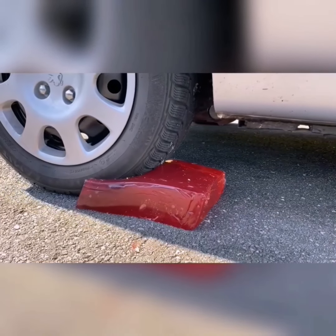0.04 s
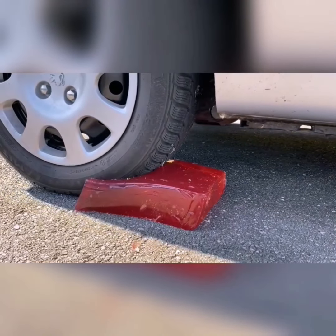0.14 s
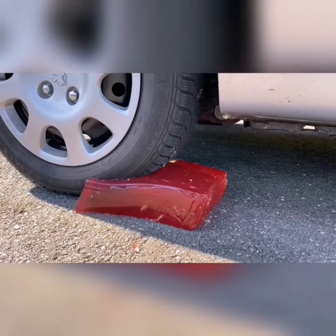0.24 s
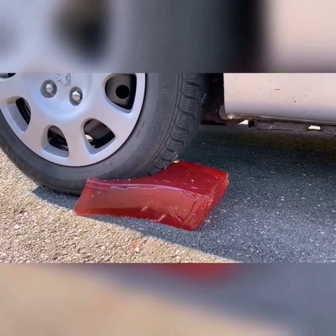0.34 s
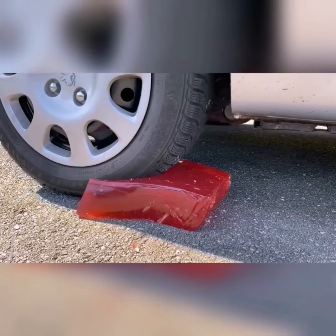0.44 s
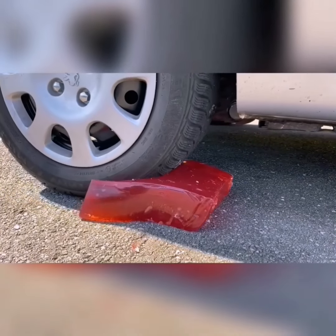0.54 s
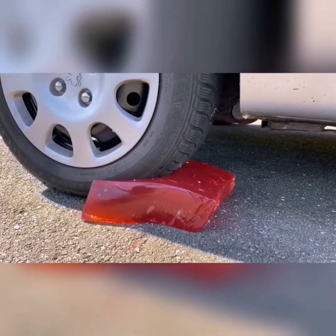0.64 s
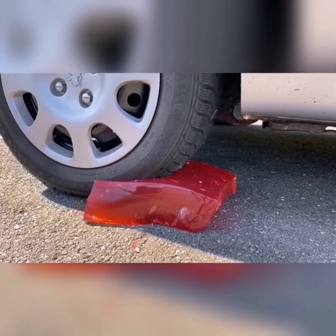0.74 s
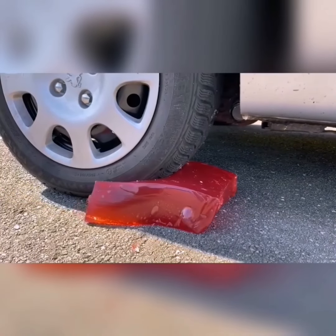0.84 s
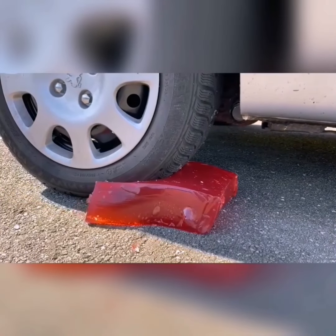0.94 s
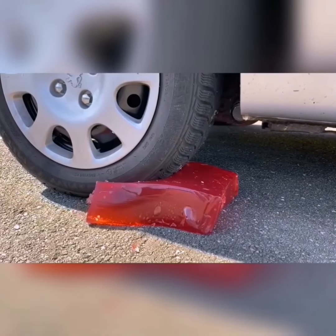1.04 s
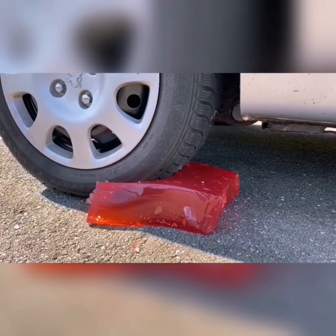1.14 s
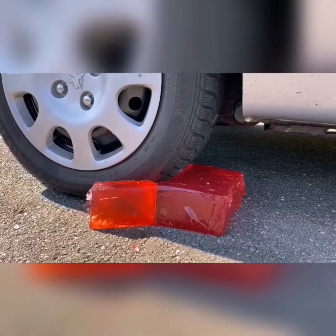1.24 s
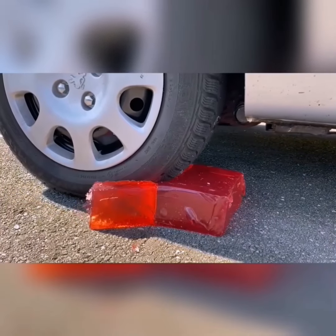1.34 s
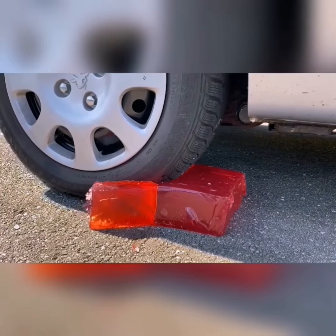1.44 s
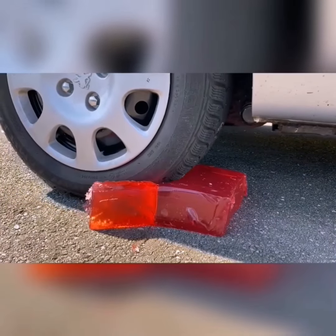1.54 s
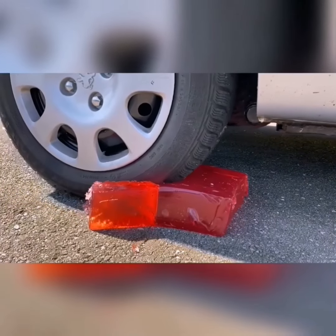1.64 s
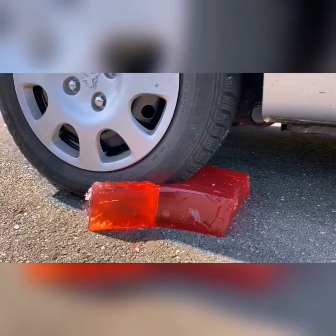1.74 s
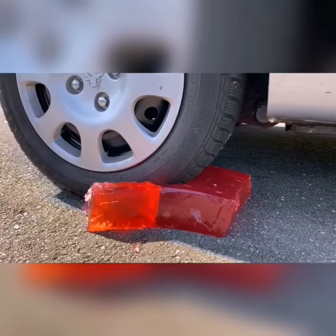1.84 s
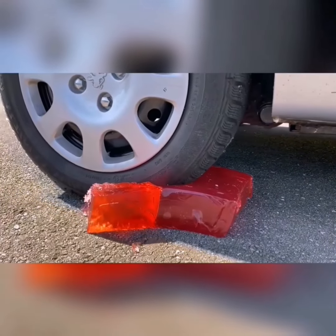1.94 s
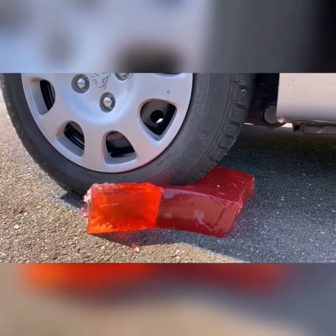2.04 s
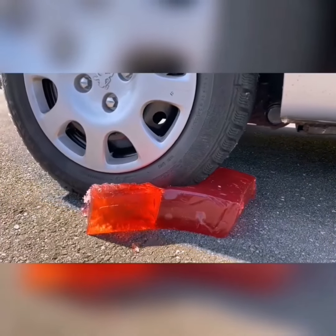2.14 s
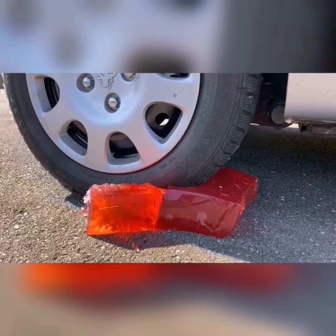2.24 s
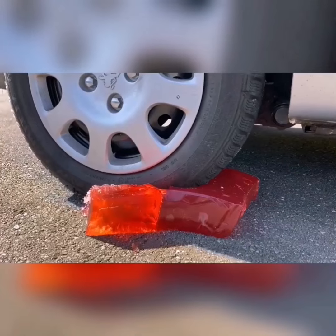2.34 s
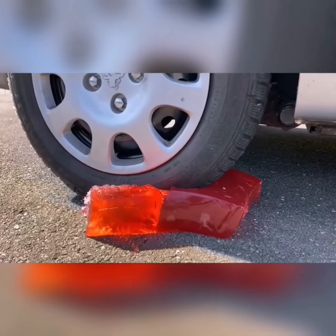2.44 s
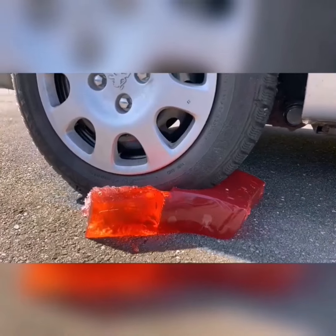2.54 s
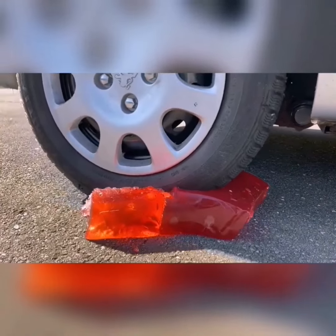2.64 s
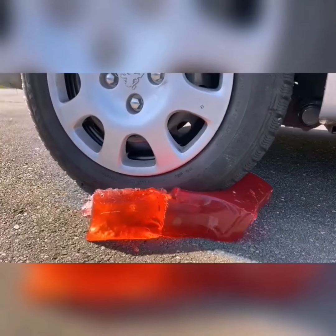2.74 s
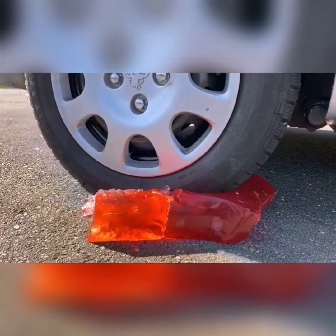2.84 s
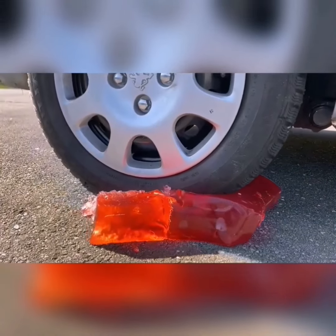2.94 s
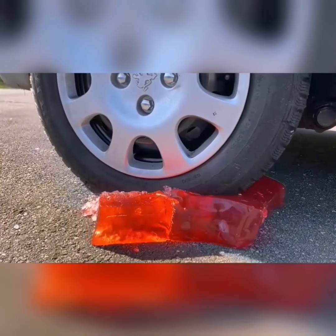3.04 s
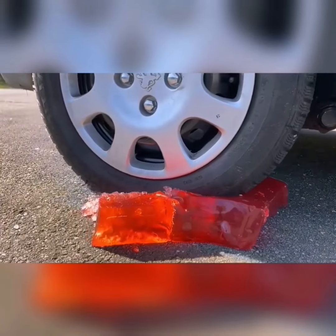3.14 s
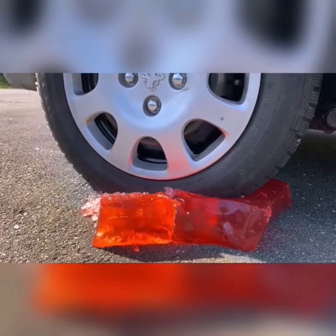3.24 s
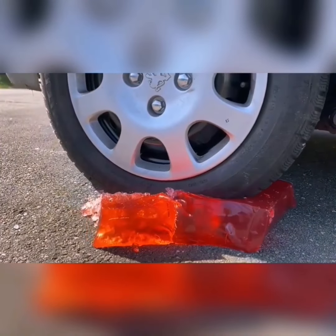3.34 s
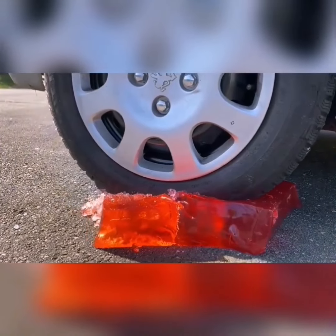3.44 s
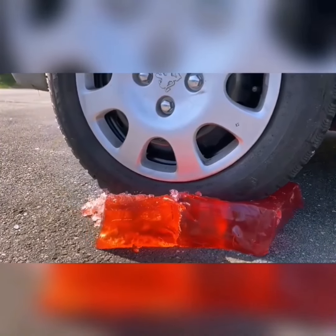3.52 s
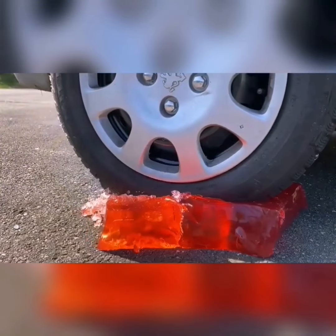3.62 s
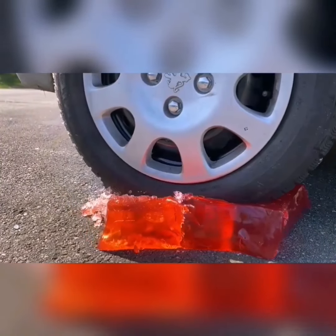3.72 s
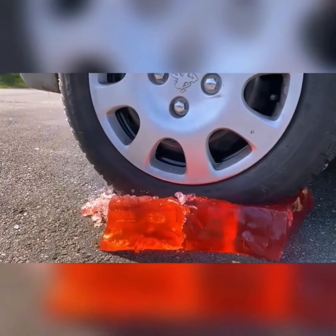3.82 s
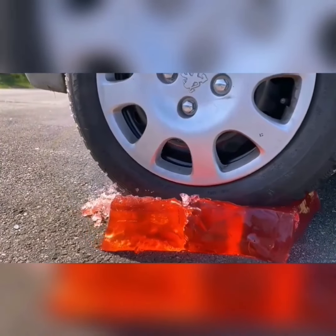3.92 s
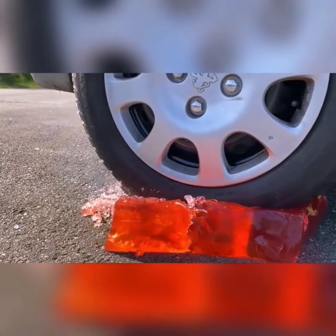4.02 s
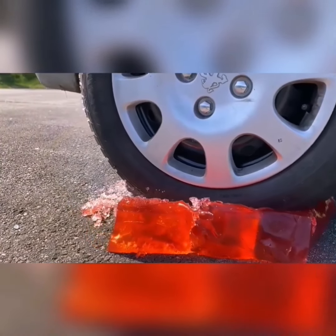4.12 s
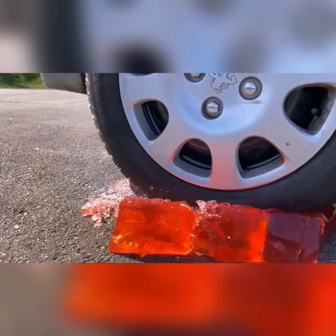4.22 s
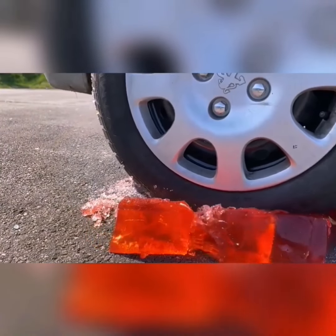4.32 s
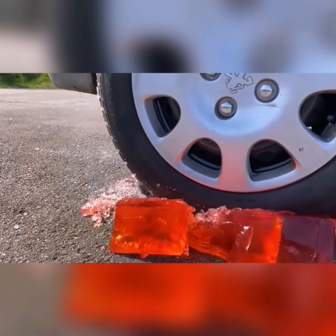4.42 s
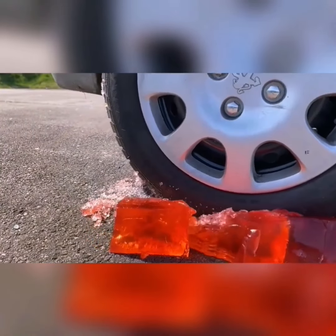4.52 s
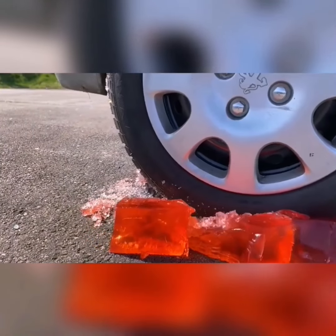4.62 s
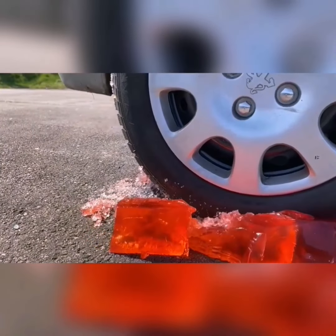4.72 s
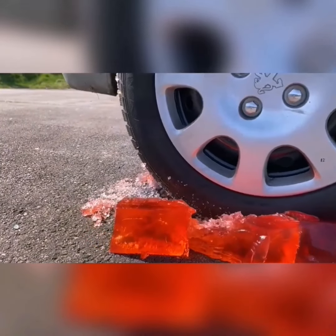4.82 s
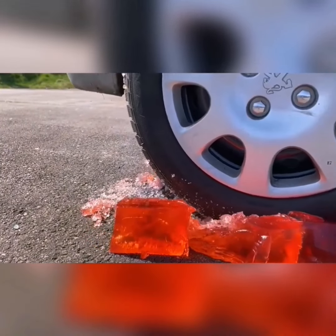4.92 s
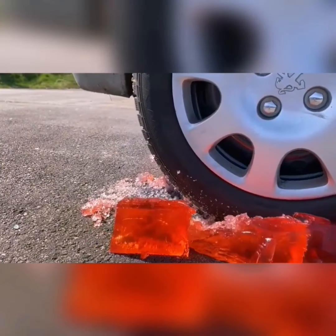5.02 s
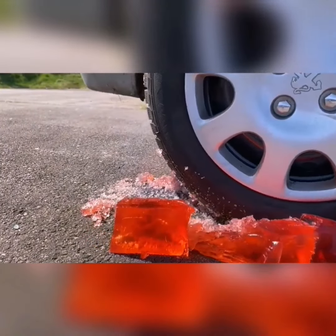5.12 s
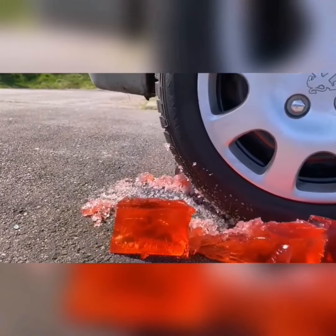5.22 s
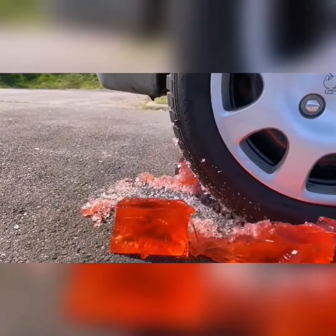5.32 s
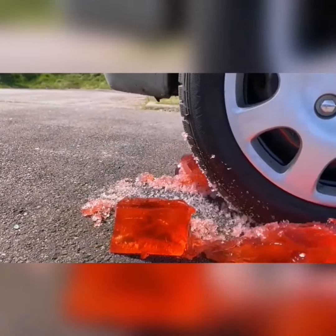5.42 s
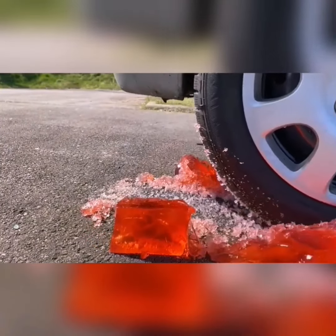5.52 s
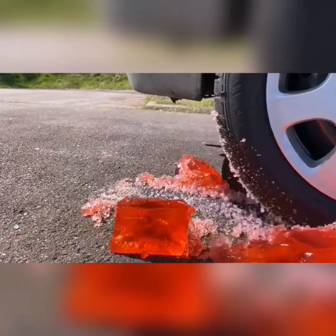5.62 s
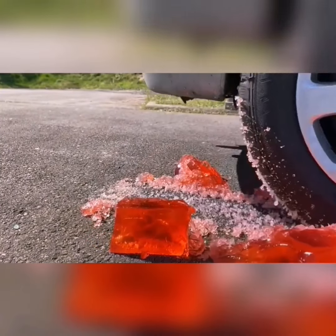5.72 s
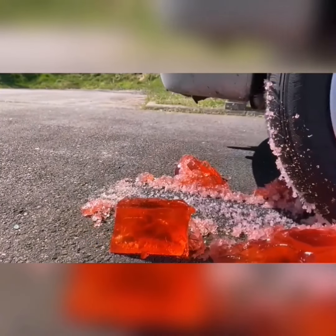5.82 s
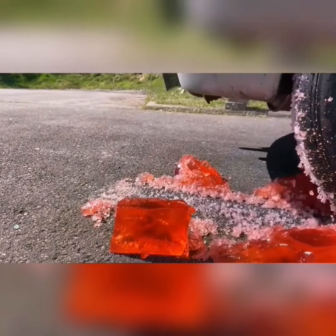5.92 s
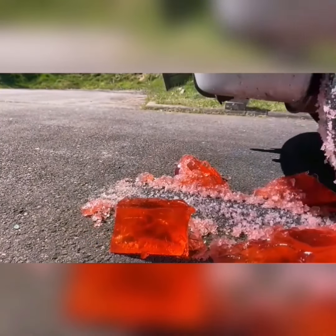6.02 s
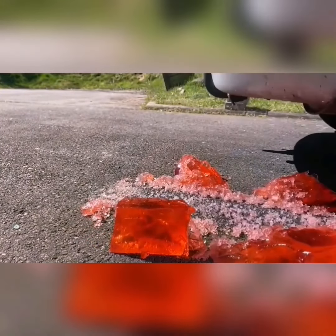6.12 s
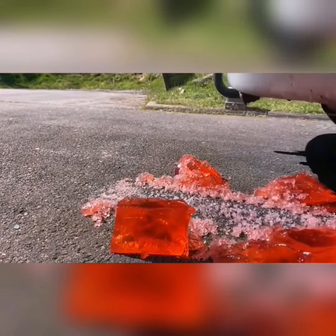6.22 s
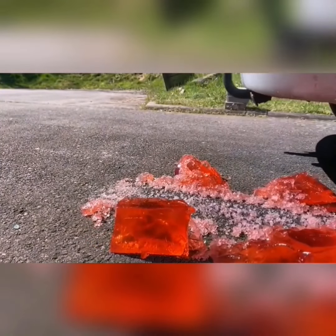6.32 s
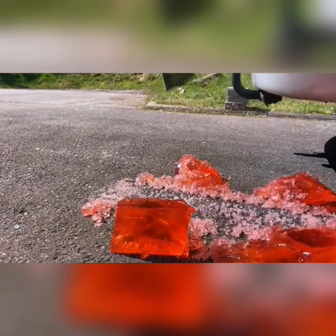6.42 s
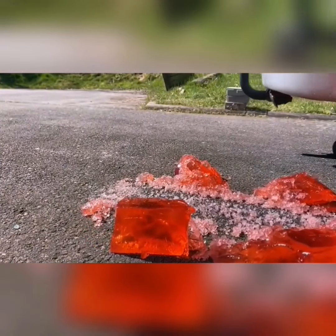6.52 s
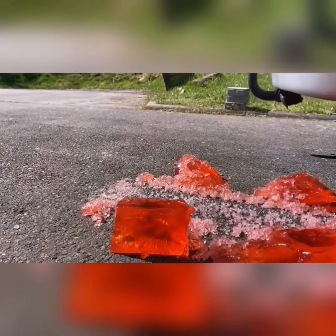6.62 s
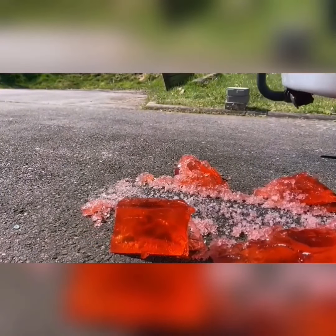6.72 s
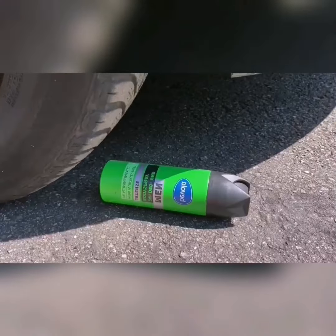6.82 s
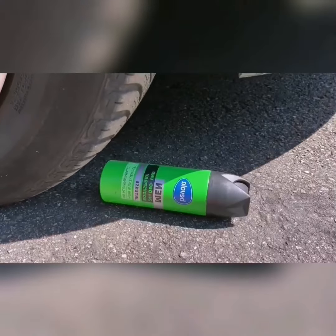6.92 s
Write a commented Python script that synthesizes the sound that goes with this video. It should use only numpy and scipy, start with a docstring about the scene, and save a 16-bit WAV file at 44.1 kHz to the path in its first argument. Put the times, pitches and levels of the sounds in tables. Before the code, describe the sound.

Heard in stereo close to the wheel on a paved surface, a small car idles with a lumpy, low putter and a faint thin whistle. Repeated light revs build a booming throb with clatter and a wavering whine. The tyre crushes a block of jelly, giving scattered wet pops and gritty crackles that grow more frequent as the revs fall away. At the very end, everything cuts to a short hiss without bass.

```python
"""A small car's exhaust putters low and uneven, heard on a stereo microphone beside the tyre.
The car creeps in blips of throttle over a block of jelly: firings boom through the silencer above
the engine's roar and clatter, with a thin whistle, brief squeaks and a geared whine.
Jelly and grit snap and squelch under the tread. At the end a bassless rush takes over abruptly."""
import sys
import numpy as np
from scipy import signal
from scipy.fft import rfft, irfft, next_fast_len
from scipy.io import wavfile
from scipy.ndimage import uniform_filter1d

SR = 44100
rng = np.random.default_rng(int(sys.argv[2]) if len(sys.argv) > 2 else 0)


def pcm_store(signal):
    """Save signal as 16-bit PCM."""
    levels = np.round(np.clip(np.atleast_2d(signal), -1, 1) * 32767)
    wavfile.write(sys.argv[1], SR, levels.astype(np.int16).T)


N = 306915
TIME = np.arange(N) / SR


def gain_of(db):
    return 10 ** (np.asarray(db) / 20)


def unit_rms(x):
    return x / np.sqrt(np.mean(x ** 2) + 1e-20)


def over_time(table):
    """A table's columns, interpolated at every sample."""
    s, *columns = np.transpose(table)
    return np.squeeze([np.interp(TIME, s, c) for c in columns])


def over_frequency(table, hz):
    """A table's columns, interpolated on a log frequency axis."""
    f, *columns = np.transpose(table)
    return np.squeeze([np.interp(np.log(hz + 1), np.log(f + 1), c) for c in columns])


def wander(rate_hz, count=1):
    """Rows of slow random drift, rms 1."""
    size = int(SR / rate_hz)
    white = rng.standard_normal((count, N))
    return unit_rms(uniform_filter1d(uniform_filter1d(white, size, axis=1), size, axis=1))


def noise_pair(colour_db, patchy_db):
    """Two unrelated noises of one colour, with drifting louder and softer patches."""
    frames, hz = N // 256 + 5, np.fft.rfftfreq(1024, 1 / SR)
    a, b, c, d, patches = rng.standard_normal((frames, 513, 5)).T
    patches = unit_rms(uniform_filter1d(uniform_filter1d(patches, size=8, axis=0), size=10, axis=1))
    spectra = np.array([a + 1j * b, c + 1j * d]) * gain_of(colour_db(hz)[:, None] + patchy_db * patches)
    return unit_rms(signal.istft(spectra, nperseg=1024, noverlap=768)[1][:, :N])


def band(x, edges_hz, order):
    return unit_rms(signal.sosfilt(signal.butter(order, edges_hz, "band", fs=SR, output="sos"), x))


def resonance(hz, centre_hz, width_hz):
    return 1 / (1 + (2 * (hz - centre_hz) / width_hz) ** 2)


# Silencer modes, under the car: f/Hz, nominal width/Hz, level/dB
SILENCER_MODES = [(82.6, 19.8, 0.5), (153.8, 40, -2.5), (201, 47.7, -10), (264, 61, -16.5), (63.3, 13.7, 0),
                  (133.4, 32.7, -9.5)]

def silencer(hz):
    """Gain in four ranges: hum, boom, bark and rasp. The modes alternate in sign."""
    hum, boom, bark, rasp, low_hum, low_boom = (
        (-1) ** k * gain_of(db) * resonance(hz, f, width) ** 1.55
        for k, (f, width, db) in enumerate(SILENCER_MODES))
    rasp = abs(rasp) + gain_of(-32.5) * resonance(hz, 350, 160)
    return np.array([hum + low_hum, boom + low_boom, bark, rasp])


# The upper modes shift as the tailpipe nears the microphone: t/s, bark/dB, rasp/dB
TAILPIPE_APPROACH = [(0, 7.5, -5), (1.5, 4.5, 4.5), (3.3, -1, -1.5), (3.9, 2.5, -1), (4.501, -7.5, 7),
                     (5.03, 2, 7.5), (5.25, -2, 9), (5.45, 5.5, 11.5), (5.65, -9, 9.5), (6.76, 1.5, 13.5)]

def exhaust(hz, turns, first_db, level_db, lift_db, rough, spread_db):
    """Firing orders and turbulent gas pass the silencer; each firing has its own strength."""
    bark_db, rasp_db = over_time(TAILPIPE_APPROACH)
    range_db = [lift_db + 1, lift_db + 2.5, 1.59 * lift_db + bark_db - 3.5, 1.18 * lift_db + rasp_db - 5]
    gains = gain_of(level_db + np.array(range_db))
    noisy = np.array([.4 * rough, .7 * rough, rough, rough ** .8])  # the upper ranges blur first
    order = np.arange(3, 25)[:, None] / 2
    passed = silencer(order * hz) * np.where(order % 1, gain_of(-42), 1)  # half orders are faint
    level = (passed * (gains * np.sqrt(1 - noisy))[:, None]).sum(0)
    unsteady = gain_of(wander(rate_hz=20, count=len(order)))
    strength = gain_of(spread_db * np.interp(turns, np.arange(400), rng.standard_normal(400)))
    # the first mode delays what passes through it, which spreads a firing in time
    hum_hz, hum_width, _ = SILENCER_MODES[0]
    lag = 0.62 * np.arctan(2 * (order * hz - hum_hz) / hum_width)
    overtones = level * unsteady * np.sin(2 * np.pi * order * turns + 0.67 * order - lag)
    first_order = gain_of(first_db) * np.sin(2 * np.pi * turns + 0.045)
    gas = unit_rms(irfft(rfft(rng.standard_normal(N)) * silencer(np.fft.rfftfreq(N, 1 / SR)), N))
    puffs = gain_of(3.9 * np.cos(2 * np.pi * turns) + 4.6 * wander(rate_hz=6.8)[0])
    turbulence = gain_of(-4) * (gains * np.sqrt(noisy) * puffs * gas).sum(0)
    return np.sqrt(2) * strength * (overtones.sum(0) + first_order) + turbulence


# Modes of the car's sheet metal: f/Hz, nominal width/Hz, relative level/dB
PANEL_MODES = [(507, 36, -12.5), (545, 30, -17), (630, 28, -14.5), (680, 26, -12.5), (752, 34, -13),
               (792, 36, -14), (1014, 24, -23.5), (1460, 34, -14), (1603, 50, -15), (1957, 80, -16.5),
               (2540, 130, -16.5), (2765, 50, -20.5)]
LOW_PANELS = [mode for mode in PANEL_MODES if mode[0] < 1200]
HIGH_PANELS = [mode for mode in PANEL_MODES if mode[0] > 1200]

def panels(modes):
    """Sheet metal shaken by the engine: narrow modes that swell and fade by chance."""
    out, swells = np.zeros((2, N)), gain_of(4 * wander(rate_hz=12, count=len(modes)))
    for (hz, width, db), swell in zip(modes, swells):
        mode = signal.iirpeak(hz, hz / width, SR)  # passed twice for steep skirts
        ring = signal.lfilter(*mode, signal.lfilter(*mode, rng.standard_normal((2, N))))
        out += gain_of(db - 1.5) * swell * unit_rms(ring)
    return out


def knock(turns, t60_s=0.036, strike_turn=0.2012):
    """Every firing strikes the large panels, which ring briefly."""
    t, firing = np.arange(3000) / SR, np.floor(turns - strike_turn).astype(int) + 1
    strikes = np.diff(firing, prepend=firing[0]) * gain_of(1.5 * rng.standard_normal(400))[firing]
    pair = []
    for _ in range(2):
        ring = sum(gain_of(db - 60 * t / t60_s) * np.sin(2 * np.pi * (hz * t + rng.random()))
                   for hz, _, db in LOW_PANELS)
        pair.append(signal.oaconvolve(strikes, ring * np.minimum(t / 0.0014, 1))[:N])
    return unit_rms(np.array(pair))


# Spectrum of the roar at the tyre: f/Hz, relative density/dB
ROAR_SPECTRUM = [(30, -24), (60, -3), (150, 0), (230, 0), (300, 1), (400, -2), (500, 3), (650, 1),
                 (800, -1), (1000, -4.5), (1250, -9), (1600, -60)]

def roar(throb, pedal):
    """Low engine noise throbs with the firings; throttle shakes the low panels harder."""
    rumble = noise_pair(lambda f: over_frequency(ROAR_SPECTRUM, f), patchy_db=3.5)
    return rumble * gain_of(-3 + 0.5 * throb) + panels(LOW_PANELS) * gain_of(0.22 * throb + pedal)


# Spectrum of the clatter at the tyre: f/Hz, relative density/dB
CLATTER_SPECTRUM = [(700, -30), (1150, -5), (1400, -1), (1700, 0), (2500, -5), (4000, -12), (6300, -15),
                    (8000, -15), (10000, -14.5), (13000, -20), (14500, -21), (14900, -24), (15400, -52),
                    (17000, -65)]

def clatter(throb):
    """Bright engine noise throbs with the firings over the high panel modes."""
    rattle = noise_pair(lambda f: over_frequency(CLATTER_SPECTRUM, f), patchy_db=2.5)
    return rattle * gain_of(0.22 * throb) + panels(HIGH_PANELS)


# Engine speed: t/s, firing rate/Hz
FIRING_RATE = [(0, 32.1), (0.2, 28.2), (0.33, 24.4), (0.48, 22.5), (0.6, 25.7), (0.7, 28), (0.86, 28.8),
               (1.2, 26.3), (1.35, 27.5), (1.43, 21.5), (1.515, 25), (1.555, 27.5), (1.6, 32.5),
               (1.7, 39.8), (1.78, 46), (1.84, 47.5), (1.95, 46.1), (2.15, 45.7), (2.31, 42.9),
               (2.52, 36.5), (2.74, 43), (2.88, 45), (3.09, 40), (3.33, 51.8), (3.46, 56), (3.56, 51.5),
               (3.65, 51), (3.79, 43.5), (4, 55.8), (4.12, 52), (4.25, 55.5), (4.37, 51.5), (4.47, 60),
               (4.59, 72), (4.66, 67), (4.76, 67), (4.93, 58), (5.17, 78), (5.39, 67.5), (5.51, 62.5),
               (5.62, 51), (5.92, 50), (6.05, 44), (6.2, 39), (6.36, 33), (6.5, 28.5), (6.76, 23.5)]
# Off the throttle, from beside the tyre: t/s, first order/dB, exhaust above it/dB, roar/dB, clatter/dB
COAST_LEVELS = [(0, -43, -45, -34.5, -49), (.2, -31.5, -37, -40, -54), (.45, -38, -35.5, -42, -61.5),
                (.9, -34, -32.5, -37.5, -55), (1.18, -31, -37.5, -40, -50.5),
                (1.228, -55, -38.5, -41.5, -69), (1.38, -54, -37.5, -42, -73), (1.5, -39, -32.5, -41, -53),
                (1.85, -36, -27.5, -29, -46.5), (2.05, -34, -31.5, -34, -47.5), (2.2, -31, -30, -30, -45),
                (2.38, -40, -34.5, -34.5, -50), (2.6, -41, -34, -38.5, -50), (2.901, -35, -35.5, -35, -48),
                (3.501, -25.5, -24.5, -32, -46), (3.68, -26, -22, -33, -47), (3.77, -36, -28.5, -30, -49.5),
                (4, -33, -21, -28, -42), (4.15, -23, -23.5, -30.5, -44), (4.35, -25.5, -25.5, -30.5, -46.5),
                (4.6, -23.5, -26, -28.5, -45), (4.75, -22, -28, -31.5, -43), (4.9, -20.5, -18.5, -27, -43),
                (5.171, -26, -21, -27, -41), (5.3, -15, -18.5, -29, -42), (5.55, -20.5, -23.5, -30.5, -46),
                (5.719, -28, -20.5, -32.5, -46), (5.921, -33, -28, -34.5, -48.5),
                (6.08, -35, -28, -34.5, -46.5), (6.3, -38, -28.5, -39.5, -51.5),
                (6.551, -27.5, -37, -44, -51), (6.76, -36, -39, -48.5, -58)]
# Uneven firing off the throttle: t/s, noisy share of the exhaust/0-1, spread of the firings/dB
UNEVEN_FIRING = [(0, .4, 3), (.5, .3, 2.5), (.75, .04, 1), (1.2, .3, 2.5), (1.45, .1, 1), (1.85, 0, .5),
                 (2.9, .06, 1), (3.5, .01, .7), (4.1, .1, 1.5), (4.7, .05, 1), (5.2, .04, .7),
                 (5.55, .12, 1.5), (5.7, 0, .5), (5.85, .1, 1), (6, .45, 3), (6.76, .5, 4.5)]

def engine(idle_clatter_db=-55):
    """The engine's sounds together, on one firing cycle that steadies as the throttle opens."""
    first_db, exhaust_db, roar_db, clatter_db = over_time(COAST_LEVELS)
    (first_lift, exhaust_lift, roar_lift, clatter_lift), pedal, release_db = throttle()
    unevenness = 1 - .95 * pedal
    rough, spread_db = over_time(UNEVEN_FIRING) * unevenness
    hz = uniform_filter1d(over_time(FIRING_RATE), size=1200)
    turns = np.cumsum(hz * (1 + 0.005 * unevenness * wander(rate_hz=21.8)[0])) / SR  # one per firing
    throb = np.cos(2 * np.pi * turns) * (1 + 2.5 * pedal)
    low = roar(throb, pedal)
    high = np.hypot(gain_of(clatter_db + clatter_lift), gain_of(idle_clatter_db)) * clatter(throb)
    low += gain_of(-19 + 13.5 * pedal) * knock(turns)
    bay = gain_of(roar_db + roar_lift) * low + high + whistle() + whine(turns)
    pipe = exhaust(hz, turns, first_db + first_lift, exhaust_db + release_db,
                   exhaust_lift, rough, spread_db)
    return bay + pipe + thuds()


# From the engine bay: t/s, f/Hz, level/dB
BAY_WHISTLE = [(.05, 6040, -80), (.2, 6046, -68), (.37, 6046, -74), (.4, 6030, -76), (.43, 6024, -62),
               (.52, 6045, -64), (.64, 6050, -63), (.7, 5975, -68), (.81, 6007, -64), (.95, 6022, -61),
               (1.05, 6022, -63), (1.15, 6025, -72), (1.27, 6050, -69), (1.44, 6025, -72),
               (1.55, 6030, -80)]

def whistle():
    """A thin, flickering tone in the opening seconds."""
    s, hz, db = np.transpose(BAY_WHISTLE)
    level = gain_of(np.interp(TIME, s, db, right=-120) + 1.6 * wander(rate_hz=21)[0])
    return np.sqrt(2) * level * np.sin(2 * np.pi * np.cumsum(np.interp(TIME, s, hz)) / SR)


# Pedal blips and their lifts: t/s, length/s, first order/dB, exhaust above it/dB, roar/dB, clatter/dB
THROTTLE_BLIPS = [(0.547, 0.21, 1, 1, -0.5, 5), (1.512, 0.27, -1, 6, 3, 4), (2.43, 0.34, -8, 9, 3.5, 3),
                  (3.116, 0.23, -11, 11, 5, 3), (3.78, 0.14, 9.5, 8.5, 2.5, 5.5),
                  (4.36, 0.17, 1.5, 11, 2, 6), (4.907, 0.19, 7, 7, 5, 10)]

def throttle(press_s=0.11, bite_s=0.1, release_s=0.095, roar_lag_s=0.031):
    """Each blip opens, holds and closes: four lifts in dB, the pedal 0-1 and a swell on release."""
    lifts_db, pedal, release_db = 0, 0, 0
    rise_s = np.c_[[press_s, press_s, press_s, bite_s]]  # the clatter comes in faster
    for s, length, *db in THROTTLE_BLIPS:
        age = TIME - s - np.c_[[0, 0, roar_lag_s, 0]]
        ramp = np.clip(np.minimum(age / rise_s, 1 + (length - age) / release_s), 0, 1)
        shape = np.sin(np.pi / 2 * ramp) ** 2
        lifts_db += np.c_[db] * shape
        pedal += shape[0]
        release_db += 1.5 * np.exp(-((age[0] - length - release_s / 2) / 0.17) ** 2)
    return lifts_db, pedal, release_db


# Jelly and grit under the tread, close to the microphone:
# t/s, level/dB, ring f/Hz, pitch sag/0-1, fizz against the ring/dB, rise/s, t60/s
TREAD_SNAPS = [(1.055, -43, 2100, 0.26, -10, 0.0015, 0.044), (1.099, -42, 1950, .3, -6, 0.0018, 0.056),
               (1.2, -43, 2470, .3, -1, 0.0018, 0.037), (2.983, -27.5, 1750, 0.49, -27, 0.0011, 0.03),
               (2.9936, -20.5, 1055, 0.57, -19, 0.001, 0.036), (3.643, -30, 2030, 0.61, -13, 0.00064, 0.03),
               (4.47, -37, 2580, 0, -11, 0.024, 0.25), (4.953, -30, 1905, .3, -10, 0.0018, 0.073),
               (5.326, -44, 4500, 0.068, 4, .002, 0.033), (5.562, -28, 4760, 0.036, 12, 0.00055, 0.017),
               (5.5613, -22, 9400, .02, -22, 0.00039, 0.016),
               (5.5635, -20.5, 2530, 0.079, -21, 0.00086, 0.014), (5.626, -42, 3050, 0, -2, 0.0085, 0.22),
               (5.656, -40, 2720, 0, 9, 0.018, 0.22), (5.658, -33, 13200, 0, -30, .022, 0.086),
               (5.746, -37.5, 3006, 0.28, -4, 0.0015, 0.026), (5.777, -42, 11100, 0.17, -3, 0.0026, 0.064),
               (5.932, -53.5, 6100, 0.15, 16, 0.0009, 0.029), (5.944, -46, 3650, 0.098, -20, 0.001, 0.027),
               (6.015, -39, 2000, 0.25, -18, 0.0023, 0.026), (6.028, -33, 2340, .4, -11, 0.001, 0.032),
               (6.082, -45.5, 5600, 0, -15, 0.0036, 0.04), (6.111, -52, 2790, 0.34, -10, 0.0015, 0.023),
               (6.136, -51.5, 4485, 0, 5.5, 0.012, 0.42), (6.21, -40.5, 3700, .2, 0, .0018, 0.02),
               (6.243, -40, 2760, 0.034, -4, 0.0013, 0.016), (6.45, -50, 2280, 0.083, -2, 0.0049, 0.097),
               (6.485, -42.5, 2250, 0.45, -18, 0.0015, 0.031), (6.585, -35, 3214, 0.34, -7.5, 0.002, 0.038),
               (6.603, -40, 2330, 0.13, -17, 0.0011, 0.011), (6.611, -55, 8900, .1, 8, 0.0011, 0.012)]

def tread(sag_s=0.0031, wet_s=.003, size=8000):
    """A pocket bursts with a fizz and a short hollow ring that falls in pitch as it opens."""
    out, t = np.zeros((2, N + size)), np.arange(size) / SR
    for s, db, hz, sag, fizz_db, rise, t60 in TREAD_SNAPS:
        burst, age = rng.standard_normal((2, size)), t - 3 * rise  # age is zero at the peak
        shape = np.where(age < 0, np.exp(-(1.5 * age / rise) ** 2), gain_of(-60 * age / t60))
        pitch_hz = hz * (1 - sag * np.tanh(age / sag_s))
        tone = np.sqrt(2) * np.sin(2 * np.pi * (np.cumsum(pitch_hz) / SR + rng.random()))
        wet = min(rise / wet_s, 1)  # slow bursts are all noise
        ring = np.sqrt(wet) * band(burst, [.85 * hz, 1.15 * hz], order=2) + np.sqrt(1 - wet) * tone
        fizz = band(burst, [min(1.5 * hz, 5000), min(6 * hz, 10500 + 3700 * wet)], order=4)
        at = round((s - 3 * rise) * SR)
        out[:, at:at + size] += gain_of(db) * (shape * ring + gain_of(fizz_db) * shape ** 2.6 * fizz)
    return out[:, :N]


# Single hard firings: t/s, level/dB
HARD_FIRINGS = [(1.184, -23), (3.566, -15.5), (4.202, -13.5), (4.301, -15.5), (4.816, -13), (4.865, -15),
                (4.956, -14), (5.905, -17), (6.013, -17), (6.084, -22.5), (6.173, -23), (6.277, -23),
                (6.333, -20), (6.521, -19.5), (6.596, -23), (6.67, -25)]
# Their ring under the car: f/Hz, relative level/dB, t60/s
SILENCER_RING = [(74.7, 4, 0.07), (146.5, 5, 0.068), (255, -6.5, 0.074)]

def thuds():
    """A hard firing rings the silencer once."""
    t, strikes = np.arange(6000) / SR, np.zeros(N)
    ring = -sum(gain_of(db - 60 * t / t60) * np.sin(2 * np.pi * hz * t) for hz, db, t60 in SILENCER_RING)
    s, db = np.transpose(HARD_FIRINGS)
    strikes[np.round(s * SR).astype(int)] = gain_of(db)
    return signal.oaconvolve(strikes, ring * np.minimum(t / 0.0043, 1))[:N]


# Thin tones from around the car: t/s, length/s, f/Hz, level/dB
CAR_SQUEAKS = [(1.55, 0.1, 4570, -57), (1.57, 0.045, 4400, -52), (1.537, 0.037, 4970, -57),
               (1.56, 0.061, 3200, -56), (3.86, 0.14, 3600, -48.5), (3.89, 0.22, 1420, -40),
               (4.03, 0.14, 2990, -54)]

def squeaks():
    """A part of the car squeaks or rings: a wavering tone with soft ends."""
    out, waver = np.zeros(N), wander(rate_hz=100)[0]
    for s, length, hz, db in CAR_SQUEAKS:
        part = slice(round(s * SR), round((s + length) * SR))
        tone = np.sqrt(2) * np.sin(2 * np.pi * np.cumsum(hz * (1 + 0.003 * waver[part])) / SR)
        out[part] += gain_of(db + 3 * waver[part]) * tone * signal.windows.tukey(len(tone), .6)
    return out


# The whine at the tyre: t/s, level/dB
WHINE_LEVELS = [(1.6, -70), (1.85, -41.5), (2.1, -44.5), (2.3, -49), (3.1, -52.5), (3.3, -36.5),
                (3.45, -50), (3.6, -36.5), (3.8, -48), (4.3, -48), (4.55, -50), (4.75, -36), (4.9, -47),
                (5.2, -50), (5.42, -37), (5.52, -42), (6.2, -54)]

def whine(turns, order=9.55):
    """A tone geared to the engine rises and falls with its speed."""
    level = gain_of(np.interp(TIME, *np.transpose(WHINE_LEVELS), left=-120, right=-120))
    return np.sqrt(2) * level * np.sin(2 * np.pi * order * turns)


# Spectrum of the closing rush: f/Hz, relative density/dB
RUSH_SPECTRUM = [(59, -101), (100, -68), (308, -12.5), (365, -6.5), (705, -12), (768, -8), (1030, -1),
                 (2130, -15), (8110, -21), (9210, -59), (9820, -19.5), (10500, -18.5), (16000, -32)]
# Its swells: t/s, gurgle/dB, wash/dB
RUSH_SWELLS = [(6.772, -71, -39.5), (6.781, -35.5, -36), (6.844, -38, -38.5), (6.918, -53, -35),
               (6.941, -30.5, -36.5), (6.955, -42, -37.5)]
RUSH_START_S = 6.765

def rush(split_hz=700):
    """A low gurgle and an upper wash of noise swell separately; a tick opens the wash."""
    gurgle_db, wash_db = over_time(RUSH_SWELLS)
    gurgle = noise_pair(lambda f: over_frequency(RUSH_SPECTRUM, f) - 40 * (f > split_hz), patchy_db=2.5)
    wash = noise_pair(lambda f: over_frequency(RUSH_SPECTRUM, f) - 40 * (f <= split_hz), patchy_db=2.5)
    tick = 1 + 2.3 * np.exp(-abs(TIME - RUSH_START_S) / 0.0017)
    return gain_of(gurgle_db) * gurgle + gain_of(wash_db + 1.5) * wash * tick


def in_stereo(pair, image):
    """Stereo image: sets left-right likeness, phase and balance by frequency."""
    size = next_fast_len(N)
    likeness, phase, lean_db = over_frequency(image, np.fft.rfftfreq(size, 1 / SR))
    left, own = rfft(pair, size)
    right = np.exp(1j * phase) * (likeness * left + 1j * np.sqrt(np.maximum(1 - likeness ** 2, 0)) * own)
    lean = gain_of(lean_db / 2)
    return irfft(np.array([left * lean, right / lean]), size)[:, :N]


# Stereo images: f/Hz, left-right likeness/0-1, right phase/rad, left over right/dB
CAR_IMAGE = [(130, .997, 0, .2), (345, .85, 0, -.3), (520, .65, -1.6, 2), (860, .68, -2.1, 4),
             (1100, .4, -2.8, 2), (1400, .45, -4.4, 1), (1720, .7, -5.5, 2), (2070, .83, -6.1, 1),
             (3100, .5, -7.6, 2), (4800, .4, -6.8, 2.5), (7750, .3, -4, 0), (8600, .95, -3.1, 0),
             (9300, .42, -6.5, 0), (11000, .6, -6.3, 0), (11400, .99, -9.42, 0), (12700, .99, -9.42, 0),
             (13100, .99, -12.57, 0)]  # with a hollow, out-of-phase band in the treble
RUSH_IMAGE = [(297, 0.65, 1, 0.5), (990, 1, 1, 1.5), (1720, 0.8, -0.5, 5), (2270, 0.24, -4, 5.5),
              (5400, 0.16, 6.5, 2.5), (8700, 0.47, -2.5, 0), (9300, .99, 2, 0), (9450, 0.38, 3.5, 0),
              (12100, 0.23, 1, 0)]

def scene():
    """The car from beside the tyre, until the rush replaces it within a millisecond."""
    switch = np.clip((TIME - RUSH_START_S) / .001, 0, 1)
    car = in_stereo(engine() + squeaks() + tread(), CAR_IMAGE)
    return (1 - switch) * car + switch * in_stereo(rush(), RUSH_IMAGE)


def record(dry, low_cut_hz=30, high_cut_hz=16400):
    """The microphone loses the deepest bass; the highest treble is cut off steeply."""
    thin = signal.sosfilt(signal.butter(2, low_cut_hz, "high", fs=SR, output="sos"), dry)
    low_pass = signal.firwin(511, high_cut_hz, window=("kaiser", 9), fs=SR)
    return signal.oaconvolve(thin, low_pass[None], "same")


dry = scene()
out = record(dry)
pcm_store(out)
```